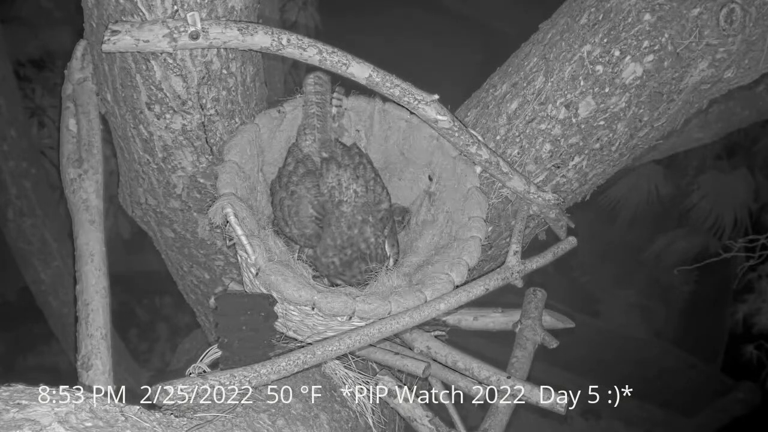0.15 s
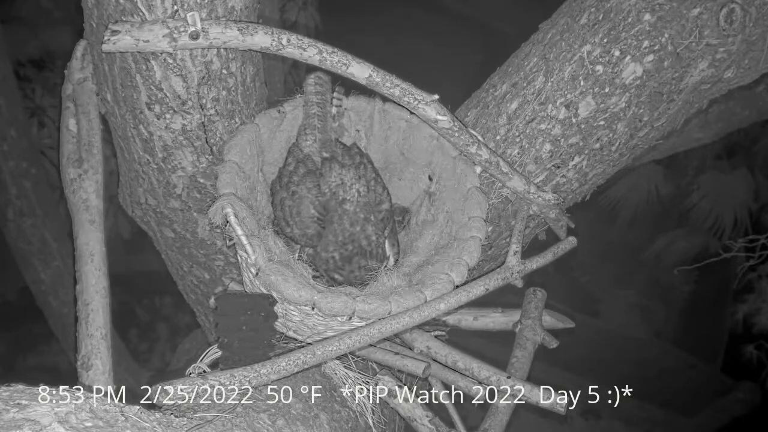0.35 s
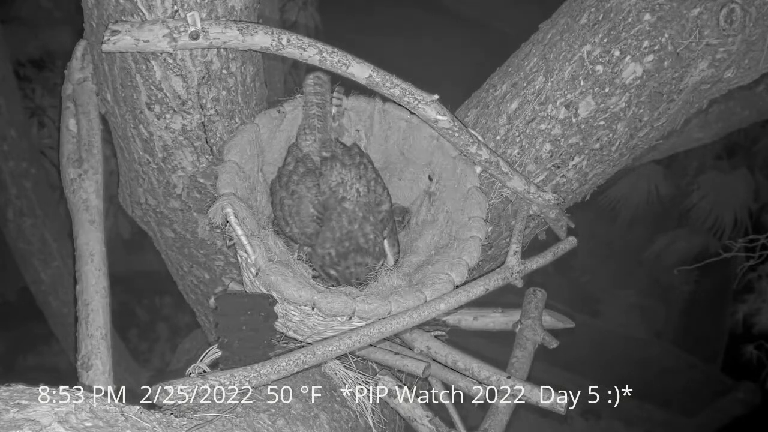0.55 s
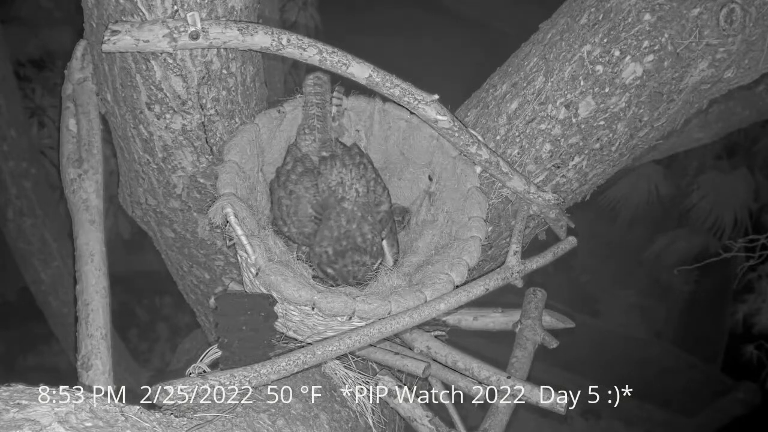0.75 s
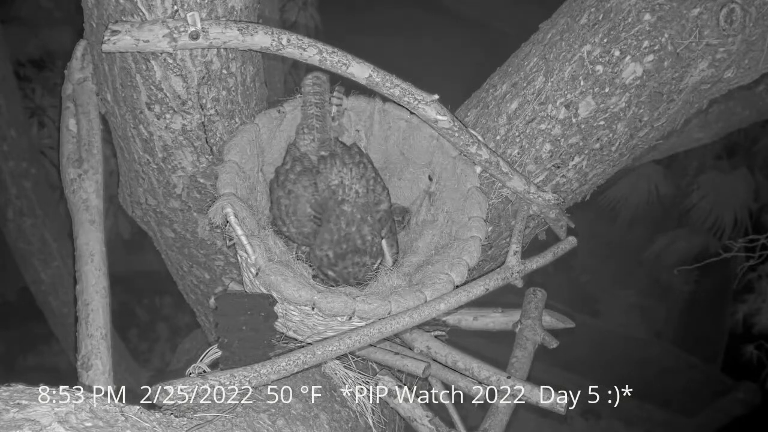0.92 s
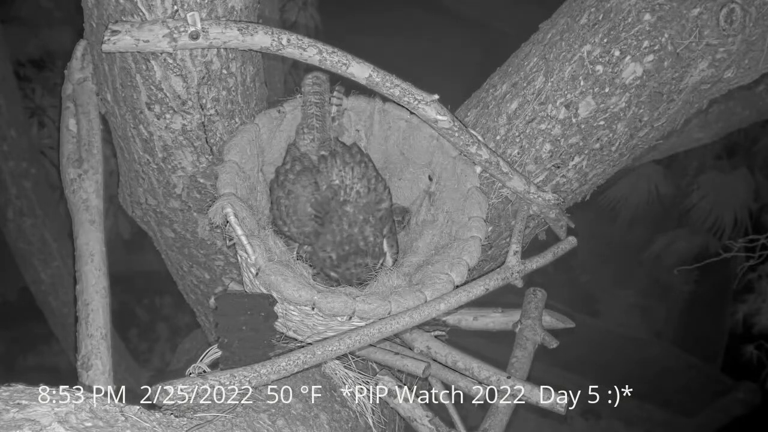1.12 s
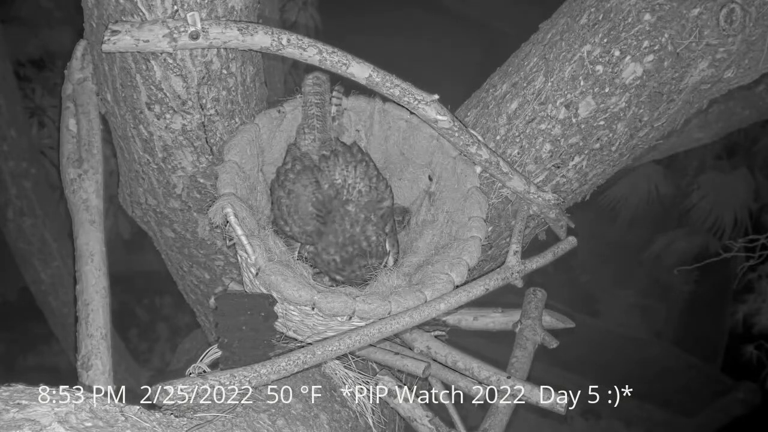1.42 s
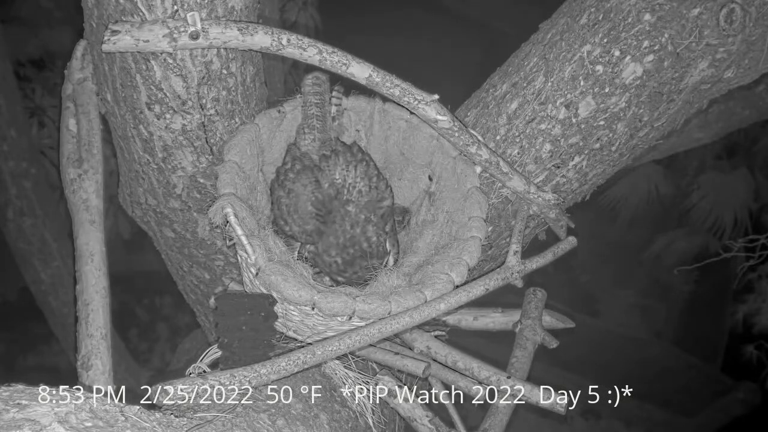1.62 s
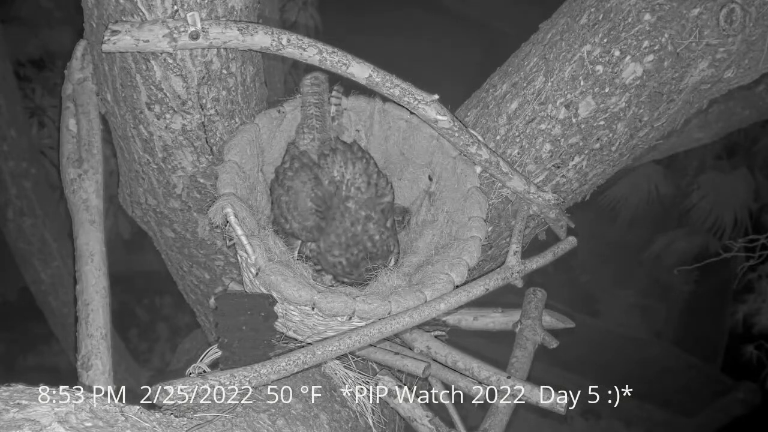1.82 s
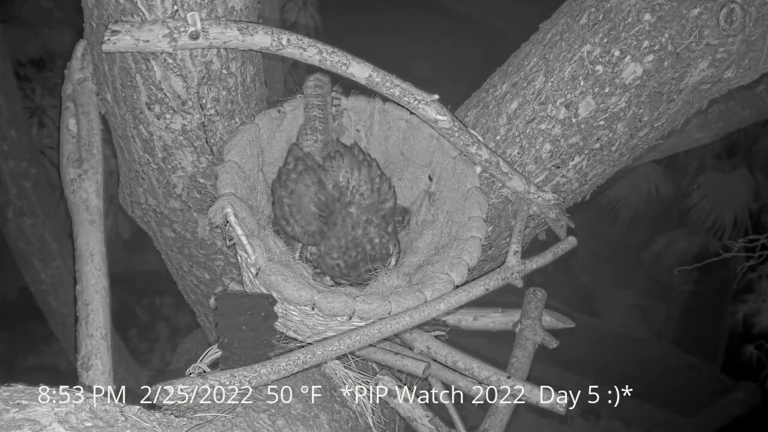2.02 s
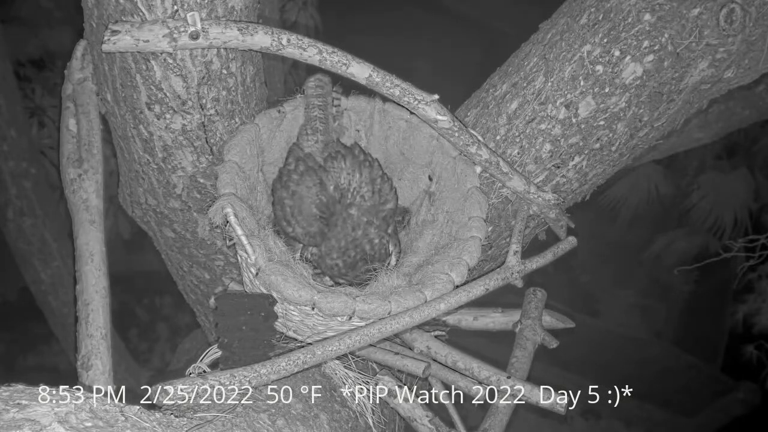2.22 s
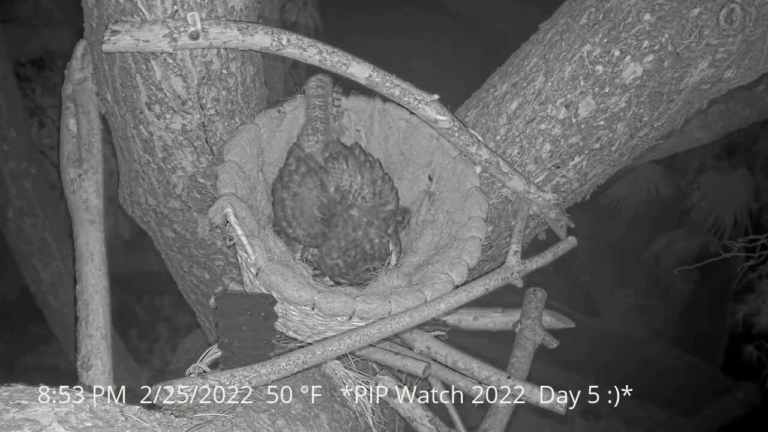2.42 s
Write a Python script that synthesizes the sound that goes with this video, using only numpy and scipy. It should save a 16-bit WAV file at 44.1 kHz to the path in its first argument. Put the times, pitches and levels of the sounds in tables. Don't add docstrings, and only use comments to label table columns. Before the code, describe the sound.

An owl close to the microphone gives six very short, low, rounded hoots at about 0.2, 0.5, 0.85, 1.2, 1.5 and 1.8 seconds, the first highest and longest, the fourth lowest and softer, the last softer too. Each has a faint short echo. Tiny nest rustles come mostly after 1.85 seconds. A steady low hum, slowly growing rumble, distant drone and faint hiss continue throughout.

```python
import sys
import numpy as np
from scipy import signal
from scipy.fft import rfft, irfft, next_fast_len
from scipy.io import wavfile
from scipy.ndimage import uniform_filter1d, map_coordinates

SR = 44100
rng = np.random.default_rng(int(sys.argv[2]) if len(sys.argv) > 2 else 0)


def voltage_ratio(decibels):
    exponent = np.asarray(decibels, float) / 20
    return 10 ** exponent


def dump_mix(stems):
    frames = np.atleast_2d(stems).T
    limited = np.clip(frames, -1, 1)
    pcm = np.round(limited * 32767).astype(np.int16)
    wavfile.write(sys.argv[1], SR, pcm)


N = 112454

# (start [s], length [s], level [dB], top pitch [Hz])
HOOTS = [
    (.200, .070, -41, 263),
    (.518, .060, -41, 252),
    (.847, .0645, -41, 257),
    (1.183, .057, -42, 238),
    (1.515, .0615, -41, 248),
    (1.828, .0585, -42, 242),
]
HOOT_OFFSET_DB = [0.13, 0.1, 0.26, 0.1, 0.065, 0.079]
# (centre [Hz], width [Hz], level [dB])
THROAT = [(225, 140, 0), (512, 110, -6), (765, 150, -13)]
# (time [s], length [s], centre [Hz], width [Hz], level [dB])
PUFFS = [(0.043, 0.027, 3180, 1800, -71.5), (1.868, 0.011, 5100, 2500, -74.5),
         (1.947, 0.033, 5700, 1400, -74), (1.95, .03, 4200, 1190, -79), (2.143, 0.023, 2460, 250, -74.5),
         (2.227, 0.026, 4600, 500, -84), (2.264, 0.011, 2900, 400, -73), (2.32, .015, 2110, 300, -77),
         (1.67, 0.12, 2930, 600, -79.5), (2.239, 0.032, 1850, 500, -71.5), (2.503, .03, 3700, 1500, -81)]
# (frequency [Hz], level [dB rms])
FAN_LINES = [(87.4, -62), (175.2, -59.5)]
# (frequency [Hz], density [dB per Hz])
RUMBLE = [(12, -3.5), (20, 6.5), (28, -15.5), (48, -7), (75, -9.5), (130, -10), (200, -16), (300, -24)]
# (frequency [Hz], density [dB per Hz])
DRONE = [(120, -17.5), (220, 1.5), (320, -3.5), (400, -4.5), (520, -3.5), (1000, -4), (1400, -18.5),
         (2200, -33)]
# (frequency [Hz], density [dB per Hz])
HISS = [(900, -15.5), (1600, 1), (2450, -2), (3000, -0.5), (5000, -5), (7000, -7.5), (8300, -18),
        (11000, -36.5)]
# (frequency [Hz], density [dB per Hz])
PREAMP = [(5000, -28.5), (7500, 0), (9000, 4), (12000, -0.5), (15800, -2.5)]


def along(points, hz):
    f, v = np.transpose(points)
    return np.interp(np.log(hz + 1), np.log(f + 1), v, left=-120, right=-120)


def unit(x):
    return x / np.sqrt(np.mean(x ** 2) + 1e-20)


def wobble(rate_hz):
    return map_coordinates(rng.standard_normal(N // 100), [np.arange(N) * rate_hz / SR])


def filtered(x, response):
    m = next_fast_len(len(x) + SR // 4)
    spectrum = rfft(x, m) * response(np.fft.rfftfreq(m, 1 / SR))
    return irfft(spectrum, m)[:len(x)]


def peak(f, hz, width_hz):
    damping = 1j * f * width_hz
    return damping / (hz * hz - f * f + damping + 1e-9)


def rush(spectrum, patchy_db, swell_db):
    z = signal.stft(rng.standard_normal(N), nperseg=512)[2]
    field = uniform_filter1d(rng.standard_normal(z.shape), size=8, axis=0)
    field = uniform_filter1d(field, size=10, axis=1)
    x = signal.istft(z * voltage_ratio(patchy_db * unit(field)), nperseg=512)[1][:N]
    coloured = filtered(x, lambda hz: voltage_ratio(along(spectrum, hz)))
    return unit(coloured * voltage_ratio(swell_db * (wobble(3.2) + wobble(8.67))))


def syrinx():
    rise, rise_s = .2, .0095
    sag, sag_s, last_pulse_s = .82, .0098, .0035
    skew_rad, skew_from = 2.5, .75
    attack_s, brighten_s, release_s = .022, .024, .0045
    fade_db, fade_s = -1, .01
    slope_db = -3
    t, out = np.arange(N) / SR, np.zeros(N)
    jitter, shimmer = 1 + .008 * wobble(120), voltage_ratio(.6 * wobble(150))
    for (start, length, db, hz), offset_db in zip(HOOTS, HOOT_OFFSET_DB):
        age = np.clip(t - start, 0, length)
        left = np.clip(start + length - t, 0, length)
        glide = 1 - rise * np.exp(-age / rise_s) - sag * np.exp(-left / sag_s)
        pitch = hz * glide * jitter
        phase = 2 * np.pi * np.cumsum(pitch) / SR
        phase -= phase[round((start + length - last_pulse_s) * SR)]
        lead = skew_rad * np.clip((pitch / hz - skew_from) / (1 - skew_from), 0, 1)
        onset = np.sin(np.pi / 2 * np.clip(age / attack_s, 0, 1))
        breath = onset * np.sin(np.pi / 2 * np.clip(left / release_s, 0, 1))
        bright = .5 + .5 * np.clip(age / brighten_s, 0, 1)
        overtone = voltage_ratio(slope_db) * bright
        pulses = sum(overtone ** k * np.cos((k + 1) * phase + k * lead) for k in range(8))
        level = voltage_ratio(db + offset_db + fade_db * np.exp(-left / fade_s))
        out += level * breath * shimmer * pitch / hz * pulses
    return out


def throat(f):
    muffle_hz = 800
    resonances = sum(voltage_ratio(db) * peak(f, hz, width_hz) for hz, width_hz, db in THROAT)
    return resonances / (1 + (f / muffle_hz) ** 6)


def owl():
    voice_db, echo_db, echo_t60_s = -.3, -21, .1
    voice = np.sqrt(2) * voltage_ratio(voice_db) * filtered(syrinx(), throat)
    tail_t = np.arange(SR // 4) / SR
    tail = rng.standard_normal(SR // 4) * voltage_ratio(-60 * tail_t / echo_t60_s)
    echo = signal.fftconvolve(voice, tail / np.linalg.norm(tail))[:N]
    return voice + voltage_ratio(echo_db) * echo


def nest_and_drips():
    t, out = np.arange(N) / SR, np.zeros(N)
    for time, length, hz, width_hz, db in PUFFS:
        puff = np.exp(-2 * ((t - time) / length) ** 2)
        noise = filtered(rng.standard_normal(N), lambda f: peak(f, hz, width_hz) ** 2)
        out += voltage_ratio(db) * puff * unit(noise)
    return out


def fan():
    drift, flutter_db = .003, 1.1
    turns = 2 * np.pi * np.cumsum(1 + drift * wobble(3)) / SR
    out = np.zeros(N)
    for hz, db in FAN_LINES:
        out += np.sqrt(2) * voltage_ratio(db + flutter_db * wobble(7.7)) * np.sin(hz * turns)
    return out


def night():
    rumble_db, rumble_growth_db_per_s = -55, .95
    drone_db, hiss_db, preamp_db = -60.5, -72.5, -91.5
    growth_db = rumble_growth_db_per_s * (np.arange(N) - N / 2) / SR
    rumble = voltage_ratio(rumble_db + growth_db) * rush(RUMBLE, patchy_db=.6, swell_db=.3)
    drone = voltage_ratio(drone_db) * rush(DRONE, patchy_db=1.22, swell_db=-.35)
    hiss = voltage_ratio(hiss_db) * rush(HISS, patchy_db=1.3, swell_db=.2)
    preamp = voltage_ratio(preamp_db) * rush(PREAMP, patchy_db=0, swell_db=0)
    return rumble + drone + hiss + preamp


def scene():
    return (owl() + nest_and_drips() + fan() + night())[None]


def top_cut(x):
    return signal.sosfilt(signal.butter(12, 15600, fs=SR, output="sos"), x)


def record(dry):
    return top_cut(dry)


dry = scene()
out = record(dry)
dump_mix(out)
```